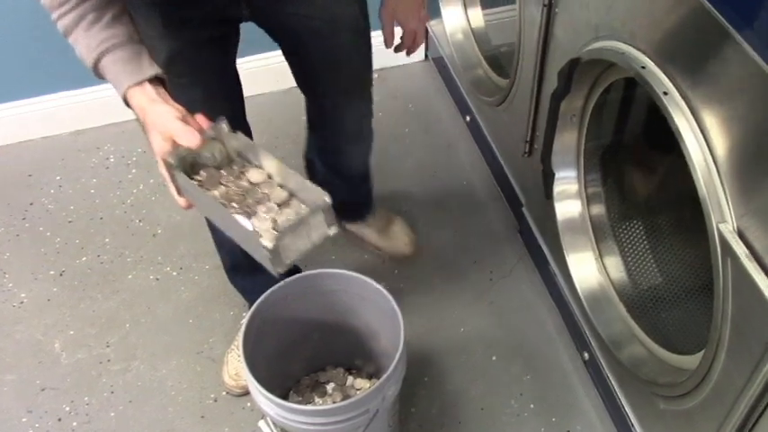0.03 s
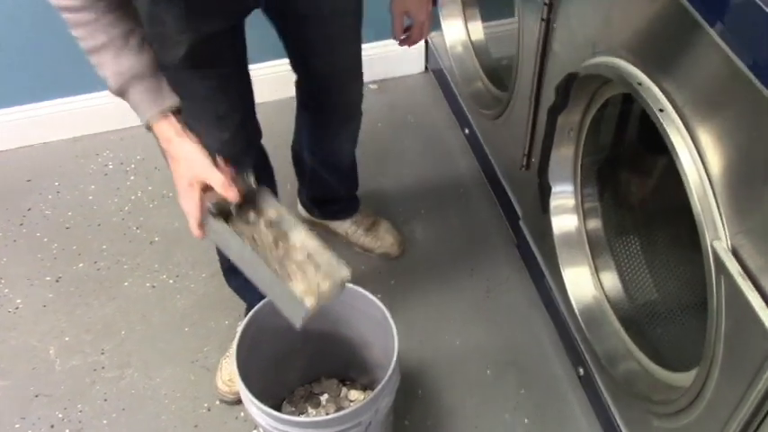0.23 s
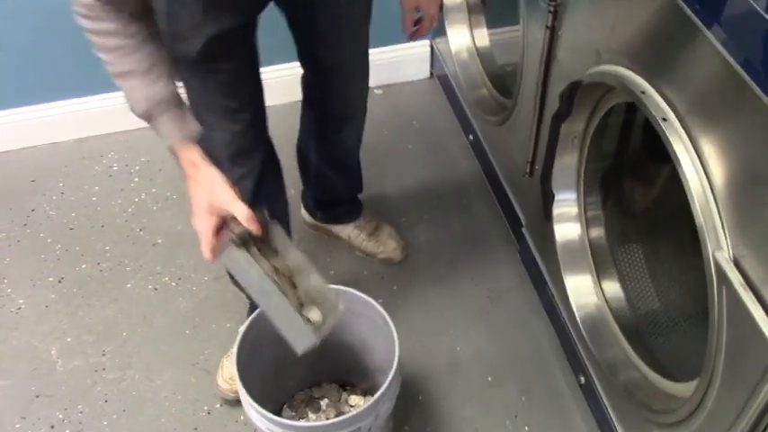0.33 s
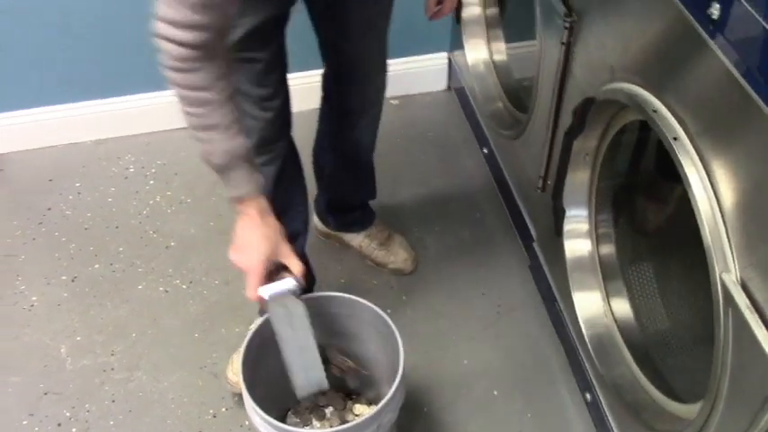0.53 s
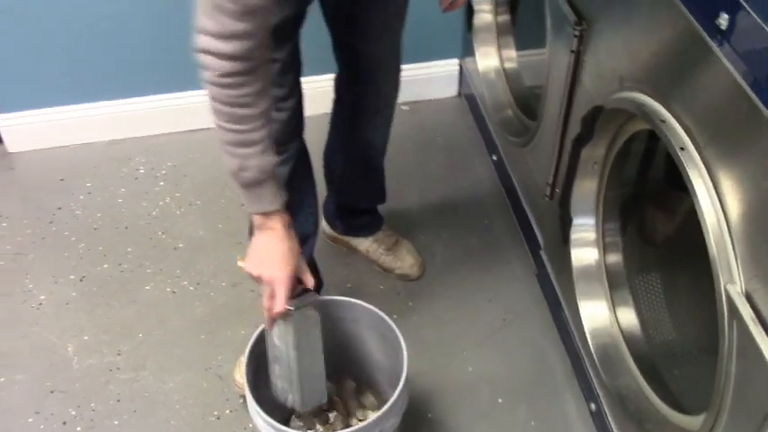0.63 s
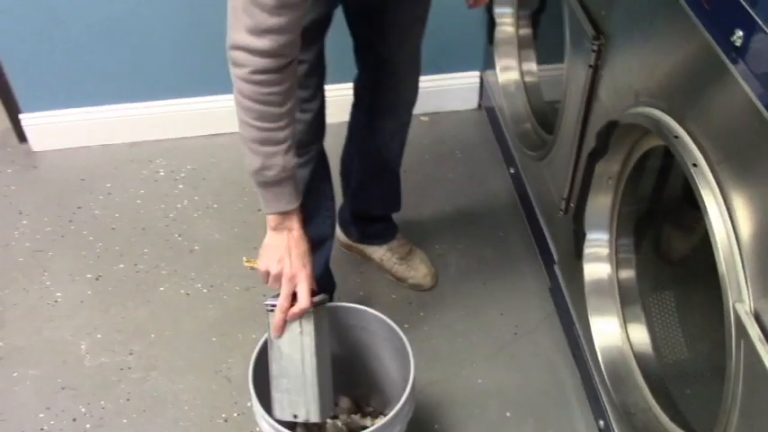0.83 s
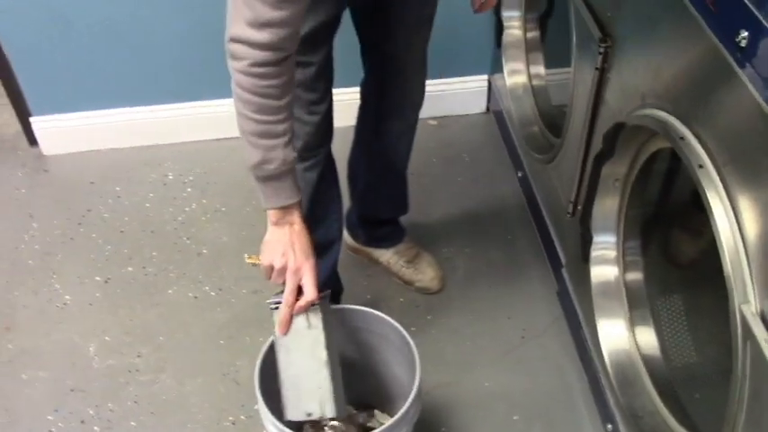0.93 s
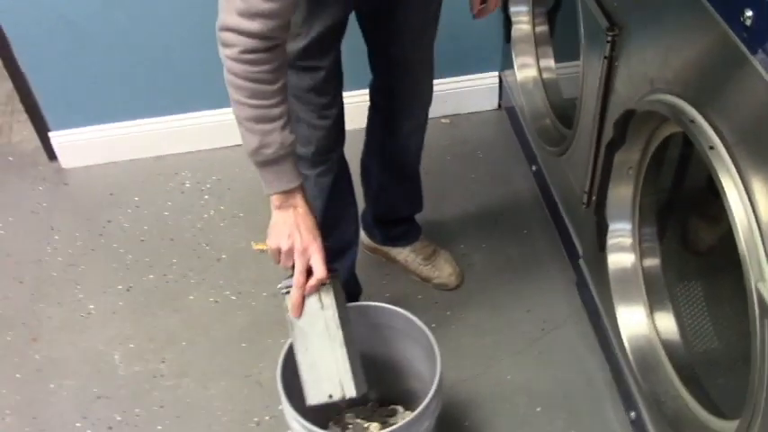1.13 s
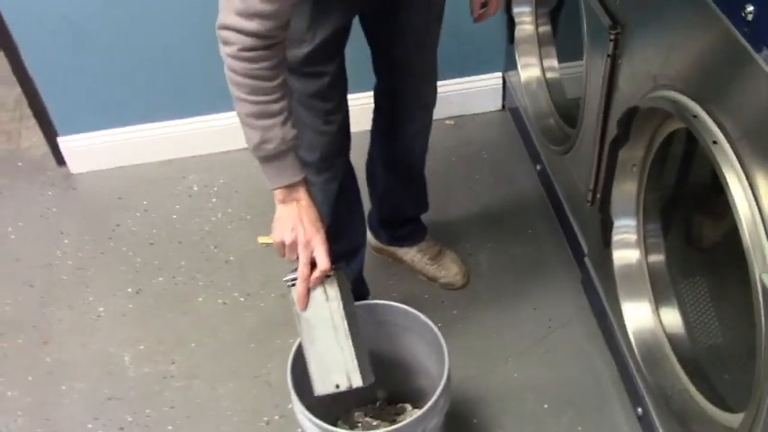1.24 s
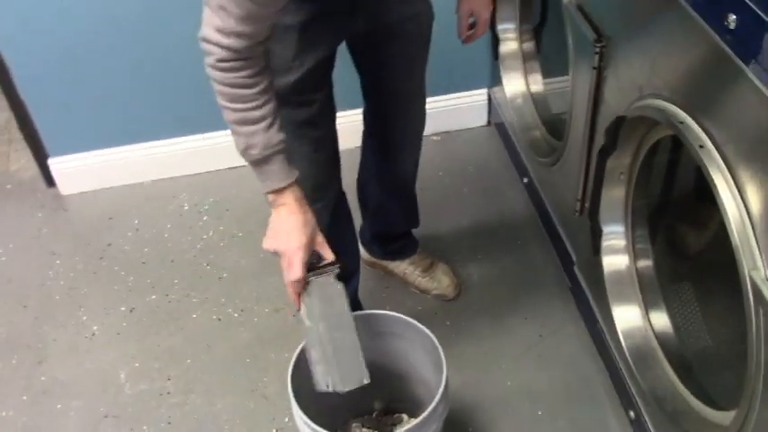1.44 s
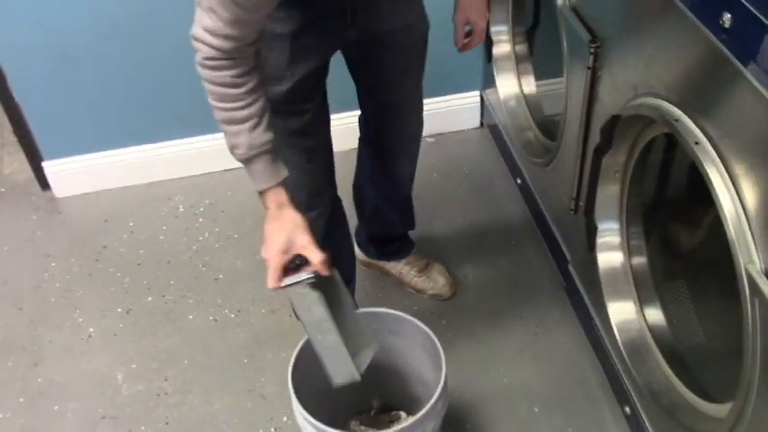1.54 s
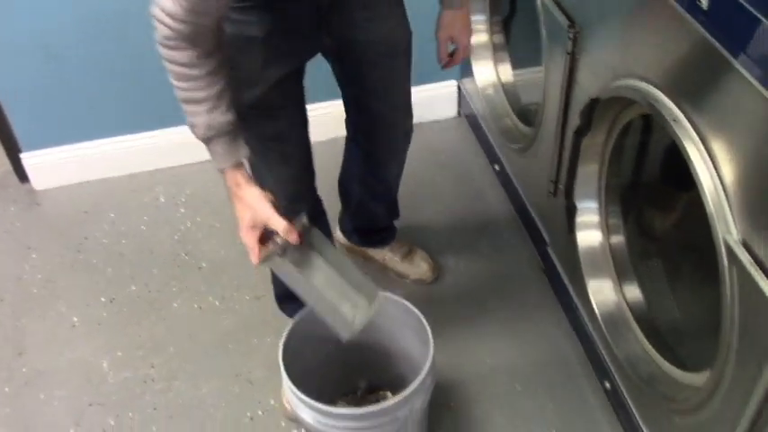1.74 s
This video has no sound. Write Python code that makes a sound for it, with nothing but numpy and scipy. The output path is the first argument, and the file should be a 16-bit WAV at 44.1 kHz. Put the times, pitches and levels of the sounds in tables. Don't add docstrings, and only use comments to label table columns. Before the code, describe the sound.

Coins pour from a metal box into a plastic bucket: a brief scraping slide with ringing knocks, then a dense bright clatter with low bucket drumming, ending in a few clinks over laundry room hum, close microphone.

```python
import sys
import numpy as np
from scipy import signal
from scipy.io import wavfile
from scipy.ndimage import uniform_filter1d

SR = 44100
rng = np.random.default_rng(int(sys.argv[2]) if len(sys.argv) > 2 else 0)


def dump(signal):
    limited = np.clip(np.atleast_2d(signal).T, -1, 1)
    pcm = np.round(limited * 32767).astype(np.int16)
    wavfile.write(sys.argv[1], SR, pcm)


def voltage_ratio(decibels):
    exponent = np.asarray(decibels, float) / 20
    return 10 ** exponent


N = 79380

GRAIN_DB, CROWD_DB = 3.0, 1.8


def evened(x):
    return x / np.sqrt(np.mean(x ** 2) + 1e-20)


def curve(rows, column=1):
    table = np.array(rows)
    return np.interp(np.arange(N) / SR, table[:, 0], table[:, column])


def level(rows, column=1):
    return voltage_ratio(curve(rows, column))


def colour(x, points):
    f, db = np.transpose(points)
    hz = abs(np.fft.fftfreq(4096, 1 / SR)) + 1
    low_cut_db = 34 * np.maximum(np.log2(f[0] / hz), 0)
    log_gain = np.log(voltage_ratio(np.interp(np.log(hz), np.log(f), db) - low_cut_db) + 1e-5)
    taps = np.fft.ifft(np.exp(np.conj(signal.hilbert(log_gain)))).real[:2048]
    return signal.oaconvolve(x, taps)[:N]


def shaped(x, gain, points):
    return colour(x * gain, points) / np.std(colour(x, points))


def ticks(per_s, spread_db):
    when, size, sign = rng.random((N, 3)).T
    height = voltage_ratio(spread_db * np.minimum(-np.log(size + 1e-9), 4))
    return evened((when < per_s / SR) * height * np.sign(sign - .5))


def ring(x, hz, width):
    r = np.exp(-np.pi * width / SR)
    return signal.lfilter([1, 0, -1], [1, -2 * r * np.cos(2 * np.pi * hz / SR), r * r], x)


def swept(x, hz, width):
    turn = np.exp(2j * np.pi * np.cumsum(hz) / SR)
    r = np.exp(-np.pi * width / SR)
    return 2 * (turn * signal.lfilter([1 - r], [1, -r], x / turn + 1e-18)).real


def bursts(rows):
    t = np.arange(N) / SR
    out = np.zeros(N)
    for s, db, length in rows:
        fall = np.exp(-np.clip((t - s) / max(length, .002), 0, 9) ** 2)
        out += voltage_ratio(db) * np.clip((t - s) / 0.0012, 0, 1) * fall
    return out


def strikes(pitch, t60, gain, count, size=2000):
    when, big, phase = rng.random((count, 3)).T
    tune, damp = rng.standard_normal((count, 2)).T
    t, at = np.arange(size) / SR, (when * N).astype(int)
    height_db = 2.0 * np.minimum(-np.log(big + 1e-9), 4)
    own_t60 = t60 * np.exp(0.3 * damp)
    tones = voltage_ratio(height_db[:, None] - 60 * t / own_t60[:, None]) * np.minimum(t / 0.00072, 1)
    tones = tones * np.sin(2 * np.pi * (pitch(tune)[:, None] * t + phase[:, None]))
    places = (at[:, None] + np.arange(size)).ravel()
    out = np.bincount(places, (tones * gain[at, None]).ravel(), N + size)[:N]
    return out / np.sqrt(np.sum(tones ** 2) / N)


def pings(rows):
    size = 8000
    out, t = np.zeros(N + size), np.arange(size) / SR
    for s, db, hz, t60 in rows:
        at, noise = round(s * SR), rng.standard_normal((2, size))
        buzz = 1 + .4 * evened(uniform_filter1d(noise[0], size=60))
        fade = voltage_ratio(-60 * 1.3 * t / t60) * np.minimum(t / 0.00088, 1)
        click = voltage_ratio(-3) * evened(ring(noise[1], hz, hz)) * np.exp(-t / 0.0011)
        out[at:at + size] += voltage_ratio(db) * (fade * np.sin(2 * np.pi * hz * t) * buzz + click)
    return out[:N]


def clumps():
    flicker = uniform_filter1d(uniform_filter1d(rng.standard_normal(N), size=500), size=300)
    return voltage_ratio(1.5 * evened(flicker))


def room(x):
    t = np.arange(SR // 2) / SR
    taps = (rng.random(len(t)) < .05) * rng.choice([-1., 1.], len(t)) * voltage_ratio(-60 * t / .3) * (t > .004)
    return signal.oaconvolve(x, taps / np.linalg.norm(taps))[:N]


# pitch in Hz, level in dB per Hz.
RUMBLE_COLOUR = [(40, -14), (100, -25), (170, -8), (340, -1.5), (800, -12), (2500, -17.5), (7000, -24.5),
                 (12000, -34), (15500, -61)]
# pitch in Hz, level in dB, width in Hz.
MOTOR_TONES = [(123, -44.5, 13), (170, -39, 14), (242.5, -37.5, 7.8), (361.1, -36.5, 8.5)]
# time in seconds, level in dB.
DUCKING = [(0, -2.5), (.22, -1), (.33, -2), (.42, -12.5), (1.35, -3.5), (1.55, -2.5)]


def hum():
    noise = rng.standard_normal((2, N))
    rumble = voltage_ratio(-31) * evened(colour(noise[0], RUMBLE_COLOUR))
    tones = sum(voltage_ratio(db) * evened(ring(ring(noise[1], hz, w), hz, 3 * w)) for hz, db, w in MOTOR_TONES)
    return (rumble + tones) * level(DUCKING)


# time in seconds, level in dB.
CREEP = [(.02, -57), (.08, -41), (.17, -37.5), (.3, -99)]
# time in seconds, level in dB, box floor ring in dB, floor pitch in Hz.
SLIDE_ROWS = [(0, -64, -60, 1400), (.06, -54, -55, 1420), (.14, -37.5, -43, 1450), (.19, -37, -60, 1290),
              (0.214, -29.5, -31, 1413), (.28, -20, -47, 1416), (0.352, -16.5, -40, 1545),
              (.42, -16.5, -28, 1532), (.47, -14, -31, 1480), (0.529, -16, -26.5, 1422),
              (.65, -16.5, -29, 1445), (.78, -21, -34, 1405), (.9, -29.5, -41, 1430),
              (1.1, -25.5, -27, 1396), (1.3, -100, -100, 1320)]
# pitch in Hz, level in dB per Hz.
SLIDE_COLOUR = [(500, -18.5), (800, -9.5), (1300, -2), (2300, 1), (5500, -0.5), (8500, 0), (11000, -5),
                (15800, -15.5)]
# time in seconds, pitch in Hz.
WALL_PITCH = [(.28, 2100), (.55, 2524), (.8, 2330)]
# start in seconds, level in dB, length in seconds, box ring in dB.
WALL_KNOCKS = [(0.055, -53, .008, -18), (0.114, -40, .008, -19), (0.131, -40, 0.017, -21),
               (0.179, -48, .008, -20), (.2046, -26, 0.004, -13), (0.2184, -13.5, 0.0064, -13),
               (.2635, -10.5, 0.0065, -15), (0.3035, -12, 0.0087, -9), (0.348, -10.5, 0.0075, -13),
               (0.389, -10, 0.0074, -2), (0.411, -10.5, .013, -6), (0.4554, -12, 0.007, -3),
               (0.493, -13.5, 0.082, -14), (0.605, -14.5, 0.017, -8), (0.631, -11.5, 0.0093, -1.5)]
# pitch in Hz, level in dB per Hz.
KNOCK_COLOUR = [(1000, -31), (1500, 0.5), (3000, -9.5), (4500, 5.5), (6000, 0.5), (8000, 6), (12000, -6),
                (15800, -15)]
# pitch in Hz, level in dB, t60 in seconds.
BOX_MODES = [(807, -5, 0.06), (1857, 1.5, 0.022), (2800, -3, 0.022), (3790, 0.5, 0.0065), (4070, 0, 0.023),
             (4550, 2, 0.01), (5790, -5, 0.014), (6520, -3, 0.0057), (7600, -4, 0.018), (8500, -5, 0.0042)]


def box_modes(x):
    return sum(voltage_ratio(db) * ring(x, hz, 1.35 / t60) / np.sqrt(t60) for hz, db, t60 in BOX_MODES)


def box_floor(x):
    hz = curve(SLIDE_ROWS, 3)
    return sum(swept(x, hz * (1 + k * 0.043), width=19) for k in (-1, 0, 1))


def box():
    slide, crowd = ticks(2500, GRAIN_DB), ticks(13000, CROWD_DB)
    sliding = slide * level(SLIDE_ROWS)
    knock_gain = bursts([row[:3] for row in WALL_KNOCKS])
    floor_push = slide * level(SLIDE_ROWS, 2)
    floor_push += crowd * bursts([(s, db + ring_db, n) for s, db, n, ring_db in WALL_KNOCKS])
    scrape = evened(ring(slide, 3160, 400)) * level(CREEP)
    wall = voltage_ratio(-11.5) * evened(swept(slide, curve(WALL_PITCH), 110)) * level(SLIDE_ROWS)
    floor = box_floor(floor_push) / np.std(box_floor(crowd))
    modes = voltage_ratio(-9) * box_modes(sliding + crowd * knock_gain) / np.std(box_modes(crowd))
    return (shaped(slide, level(SLIDE_ROWS), SLIDE_COLOUR) + scrape + wall
            + shaped(crowd, knock_gain, KNOCK_COLOUR) + floor + modes)


# start in seconds, level in dB, pitch in Hz, t60 in seconds.
CLEAR_BOX_RINGS = [(.2192, -15, 4440, 0.051), (.2192, -16, 5790, .045), (.2192, -17, 7820, 0.049),
                   (.2195, -16.5, 2215, .05), (.2195, -17, 1466, 0.065), (.221, -15, 4660, 0.066),
                   (.2645, -17, 4460, 0.038), (.2645, -19, 4700, .045), (.2645, -11, 8300, 0.034),
                   (.297, -14.5, 1428, 0.17), (.3452, -12, 2124, 0.083), (.3452, -17, 5530, 0.058),
                   (.3452, -10, 8000, 0.056), (.3452, -8.5, 1476, 0.093), (.375, -25, 1420, .06),
                   (.3911, -10.5, 1505, 0.12), (.413, -20.5, 1558, 0.088), (.425, -11, 1386, 0.078),
                   (.441, -15.5, 1367, 0.068), (.4554, -11, 1580, 0.056), (.4554, -7, 7500, 0.04),
                   (.485, -12.5, 1393, 0.08)]


def box_rings():
    return pings(CLEAR_BOX_RINGS)


# time in seconds, clatter in dB, ring of free coins in dB, drumming in dB.
POUR_ROWS = [(.1, -95, -73, -94), (.2, -90, -43, -80), (.4, -80, -22, -54), (.64, -59, -18, -63),
             (.7, -18, -16.5, -39.5), (.8, -18, -14, -40), (.93, -16.5, -11.5, -26.5),
             (1.01, -18, -12, -38), (1.07, -19, -15, -30.5), (1.14, -15.5, -17, -24),
             (1.23, -17.5, -14, -27), (1.3, -17, -17, -42), (1.36, -19.5, -18, -34.5),
             (1.462, -20, -17.5, -33), (1.49, -27.5, -35, -54), (1.59, -37, -60, -66),
             (1.67, -40.5, -59, -67), (1.74, -60, -85, -78)]
# pitch in Hz, level in dB, width in Hz.
BUCKET_MODES = [(373, -15.5, 140), (517, -20.5, 33), (750, -21, 120)]


def drumming():
    waver = evened(uniform_filter1d(rng.standard_normal(N), 2500))
    low = np.sqrt(2) * np.sin(2 * np.pi * np.cumsum(205 + 4 * waver) / SR)
    throb = 1 + .35 * evened(uniform_filter1d(rng.standard_normal(N), 900))
    hits = ring(ticks(6000, 1.85), 470, 550)
    high = sum(voltage_ratio(db) * evened(ring(hits, hz, w)) for hz, db, w in BUCKET_MODES)
    return low * level(POUR_ROWS, 3) * throb + high * level(POUR_ROWS)


# start in seconds, thud in dB, jingle in dB, length in seconds, thud pitch in Hz.
HEAP_ROWS = [(0.664, -15.5, -26, 0.0086, 1440), (0.709, -22.5, -21, 0.015, 1430),
             (0.73, -20, -40, 0.065, 1460), (0.808, -24, -19, 0.011, 2720),
             (1.063, -16.5, -42, 0.012, 1930), (1.123, -19, -13.5, 0.017, 1900),
             (1.183, -21, -15, 0.028, 1370), (1.255, -22, -9.5, 0.015, 1320),
             (1.289, -24, -22, 0.0044, 3060), (1.325, -27, -10, 0.014, 1330),
             (1.36, -25.5, -16, 0.024, 1360), (1.407, -21, -24, 0.02, 2400), (1.428, -24, -37, 0.038, 950),
             (1.478, -22.5, -45, 0.012, 1860), (1.523, -30.5, -30.5, 0.04, 2800),
             (1.629, -35.5, -49, 0.022, 2670)]
# pitch in Hz, level in dB, spread between coins as a share of pitch.
COIN_MODES = [
    (9330, -4.5, 0.0227),
    (15380, -8.5, 0.013),
]
# time in seconds, lift in dB.
UPPER_LIFT = [(.3, 1), (.6, 1.5), (.8, 3)]


def jingle_gain():
    return bursts([(s, jingle_db, n) for s, _, jingle_db, n, _ in HEAP_ROWS])


def coins():
    drive = level(POUR_ROWS, 2) + voltage_ratio(0.5) * uniform_filter1d(jingle_gain(), 100)
    out = np.zeros(N)
    for (hz, db, spread), lift in zip(COIN_MODES, (1, level(UPPER_LIFT))):
        out += voltage_ratio(db) * strikes(lambda u: hz * (1 + spread * u), .055, drive * lift, count=2200)
    return out


# pitch in Hz, level in dB per Hz.
CLATTER_COLOUR = [(250, -39), (500, -3), (1400, 4), (2800, 4.5), (5200, -3.5), (8000, 4), (11500, -2.5),
                  (14500, -3)]
# pitch in Hz, level in dB per Hz.
THUD_COLOUR = [(200, 0), (500, 1.5), (1400, 7.5), (3000, -4), (5000, -16), (15800, -56)]
# pitch in Hz, level in dB per Hz.
JINGLE_COLOUR = [(2000, 3), (5000, -4.5), (7500, 7.5), (10000, 7), (13500, 2), (15800, -5)]
# pitch in Hz, level in dB per Hz.
FIZZ_COLOUR = [(6000, -12), (8000, 0), (11000, 1), (14500, -5.5), (15800, -4)]


def bucket():
    rain, crowd, other = ticks(3300, GRAIN_DB), ticks(9000, CROWD_DB), ticks(9700, CROWD_DB)
    clatter = shaped(rain, level(POUR_ROWS) * clumps(), CLATTER_COLOUR)
    thuds = shaped(crowd, bursts([(s, db, n) for s, db, _, n, _ in HEAP_ROWS]), THUD_COLOUR)
    for s, db, _, n, hz in HEAP_ROWS:
        tone = ring(crowd * bursts([(s, db, n)]), hz, 130) / np.std(ring(crowd, hz, 160))
        thuds = thuds + voltage_ratio(-7) * tone
    clinks = strikes(lambda u: 2100 * np.exp(.45 * u), 0.033, level(POUR_ROWS), count=1400, size=1300)
    fizz = shaped(ticks(7000, GRAIN_DB), level(POUR_ROWS, 2) * clumps(), FIZZ_COLOUR)
    jingles = shaped(other, jingle_gain(), JINGLE_COLOUR)
    return clatter + thuds + voltage_ratio(-7) * clinks + voltage_ratio(-6.5) * fizz + jingles


# start in seconds, level in dB, pitch in Hz, t60 in seconds.
CLEAR_CLINKS = [(0.661, -3.5, 1375, 0.058), (0.666, -13, 2880, 0.062), (.664, -17, 527, 0.087),
                (0.679, -15, 2470, .05), (.708, -7, 1340, 0.056), (.709, -8, 1850, 0.037),
                (0.731, -9, 2916, 0.078), (0.746, -7.5, 1410, 0.035), (0.764, -10, 1920, 0.044),
                (.815, -12, 1920, .04), (0.813, -19, 3150, .04), (1.033, -12, 2990, 0.051),
                (1.074, -12, 1970, 0.056), (1.123, -11, 3600, 0.033), (1.145, -12.5, 2180, 0.043),
                (1.186, -11, 1365, .05), (1.292, -10.5, 2860, 0.047), (1.293, -8, 1407, 0.044),
                (1.33, -18, 1390, 0.045), (1.404, -23, 2390, .05), (1.404, -13, 1322, 0.12),
                (1.424, -28, 980, 0.036), (1.432, -15, 2100, .04), (1.481, -31, 1850, 0.029)]


def pile_clinks():
    return pings(CLEAR_CLINKS)


# start in seconds, level in dB, pitch in Hz, t60 in seconds.
STRAGGLERS = [
    (1.53, -24.5, 9500, 0.4),
    (1.54, -18.5, 9300, .25),
    (1.54, -30, 15300, .2),
]


def last_coins():
    t = np.arange(N) / SR
    choke_db = 900 * np.maximum(t - 1.55, 0)
    out = np.zeros(N)
    for s, db, hz, t60 in STRAGGLERS:
        fade = voltage_ratio(db - 60 * np.maximum(t - s, 0) / t60 - choke_db) * np.clip((t - s) / 0.0055, 0, 1)
        out += fade * (np.sin(2 * np.pi * hz * t) + 0.49 * np.sin(2 * np.pi * (hz + 45) * t))
    return out


# pitch in Hz, side against mid in dB.
SIDE_COLOUR = [(300, -10), (600, -17.5), (1200, -22), (2500, -18), (5000, -14), (9500, -15), (13000, -11),
               (15400, -16)]


def scene():
    metal = box() + box_rings() + drumming() + clumps() * coins() + bucket() + pile_clinks() + last_coins()
    mid = metal + voltage_ratio(-11) * room(metal) + hum()
    smear = rng.standard_normal(3000) * np.exp(-np.arange(3000) / 600) / np.sqrt(300)
    wide = signal.oaconvolve(metal, smear)[:N]
    side = colour(wide, SIDE_COLOUR) + voltage_ratio(-15) * hum()
    return np.array([mid + side, mid - side])


def top_cut(x):
    return signal.sosfilt(signal.butter(12, 16530, fs=SR, output="sos"), x)


def record(dry):
    x = dry / (1 + (dry / .9) ** 4) ** .25
    x = signal.lfilter(*signal.butter(2, 84, "high", fs=SR), x)
    x = signal.oaconvolve(x, signal.firwin(1023, 15700, window=("kaiser", 9), fs=SR)[None], "same")
    return top_cut(x)


dry = scene()
out = record(dry)
dump(out)
```